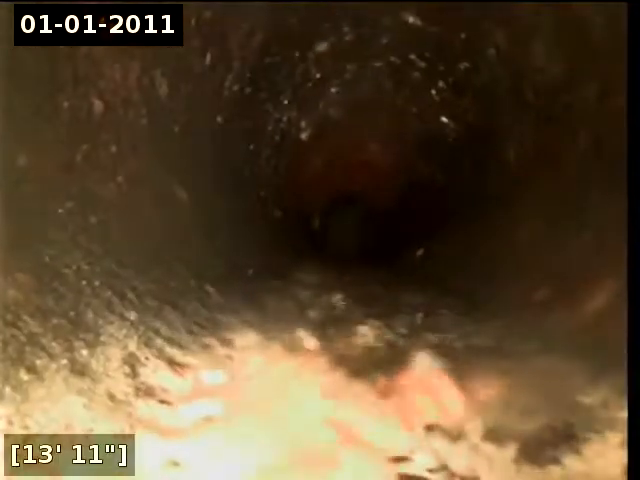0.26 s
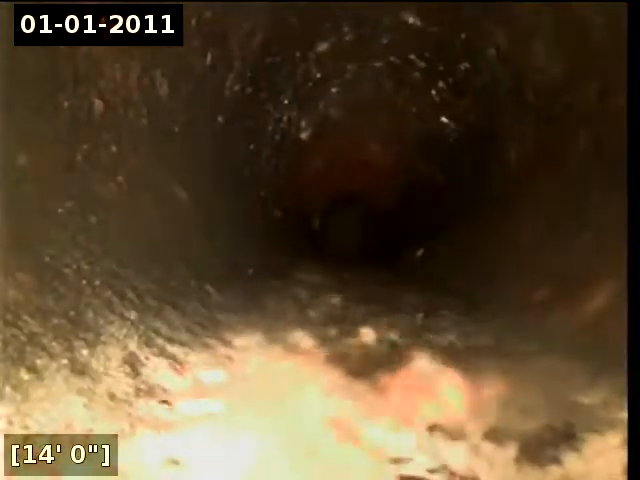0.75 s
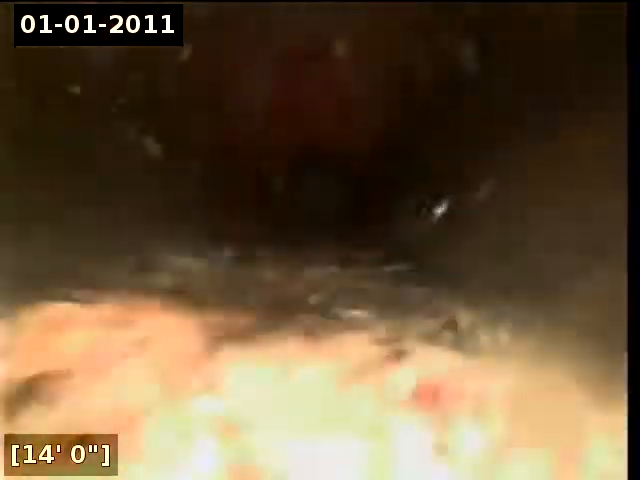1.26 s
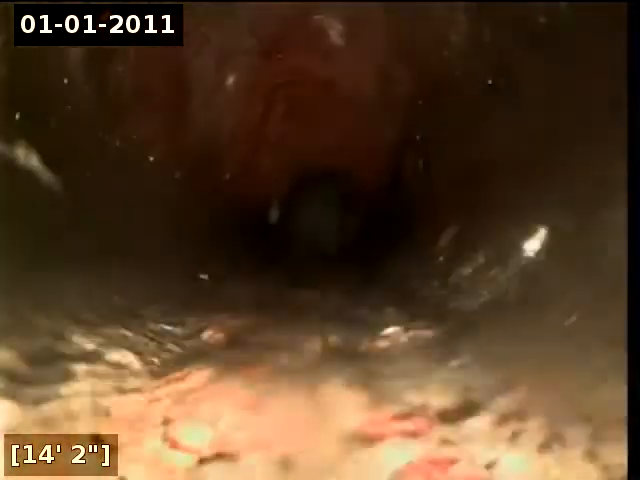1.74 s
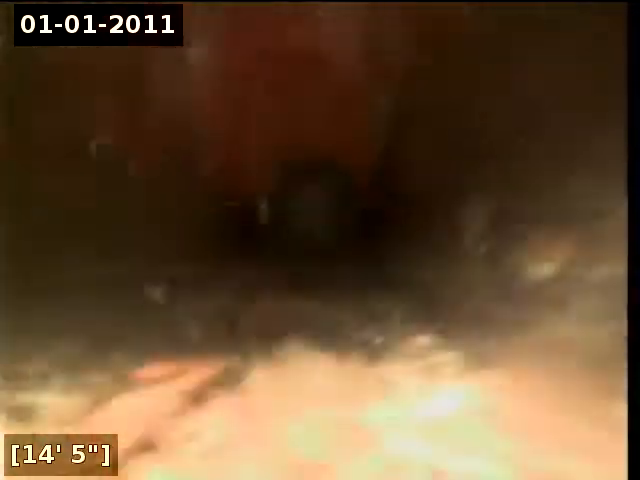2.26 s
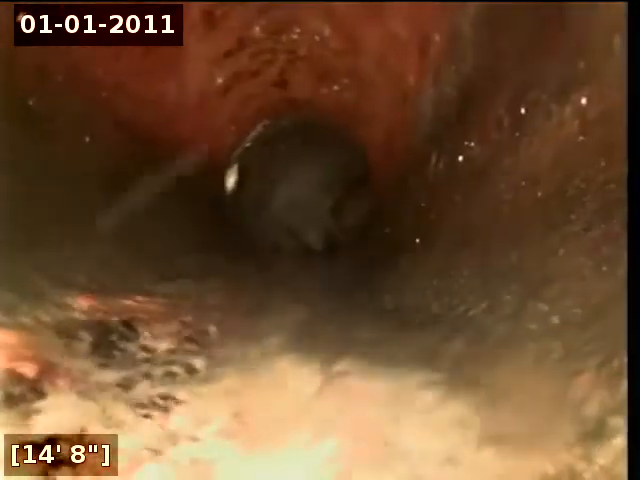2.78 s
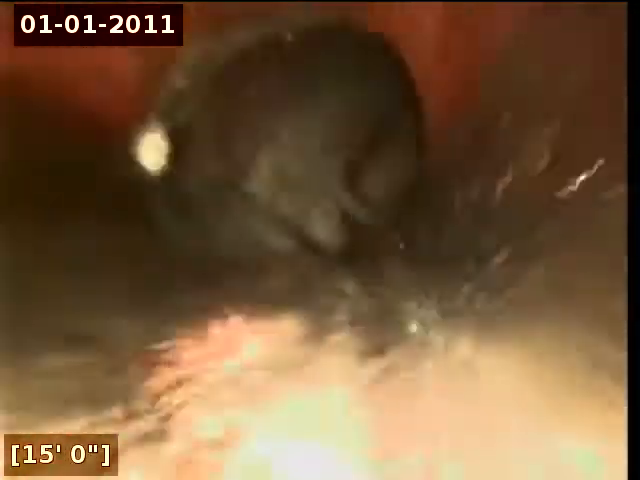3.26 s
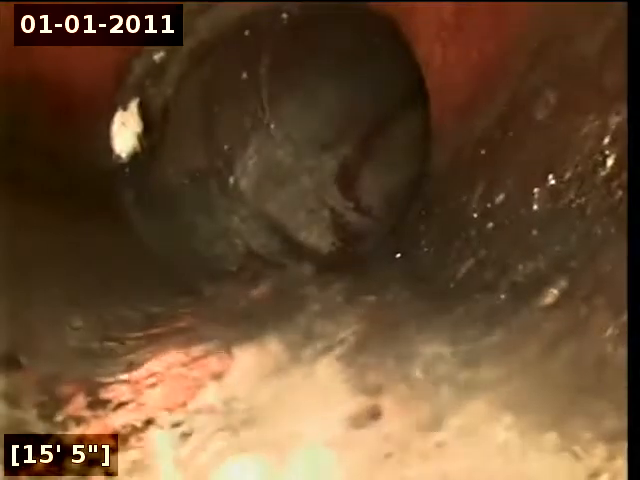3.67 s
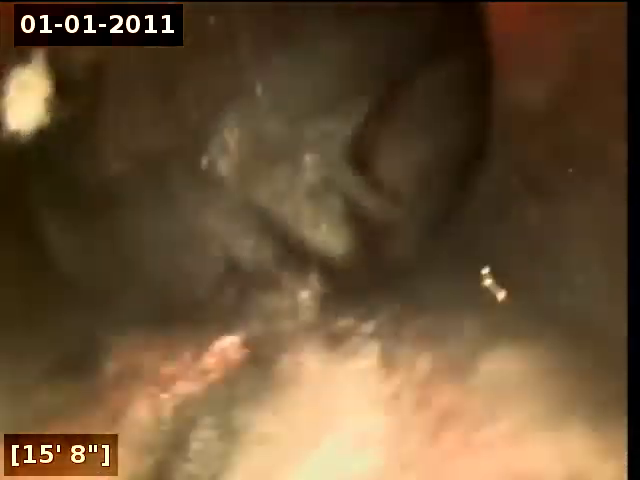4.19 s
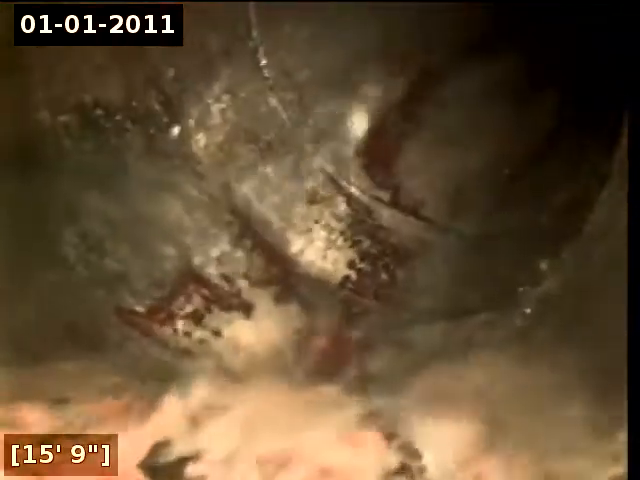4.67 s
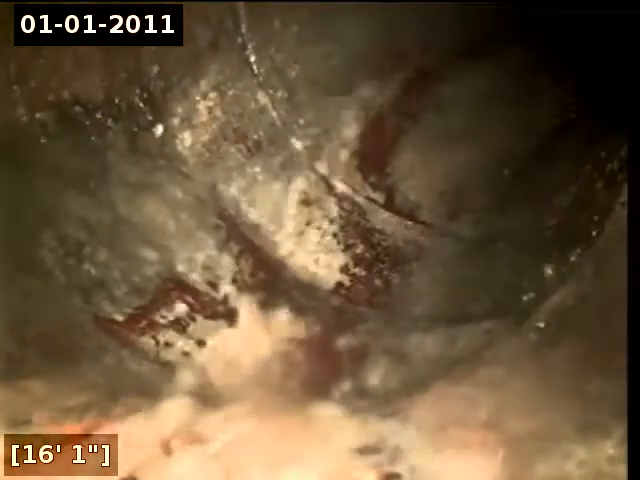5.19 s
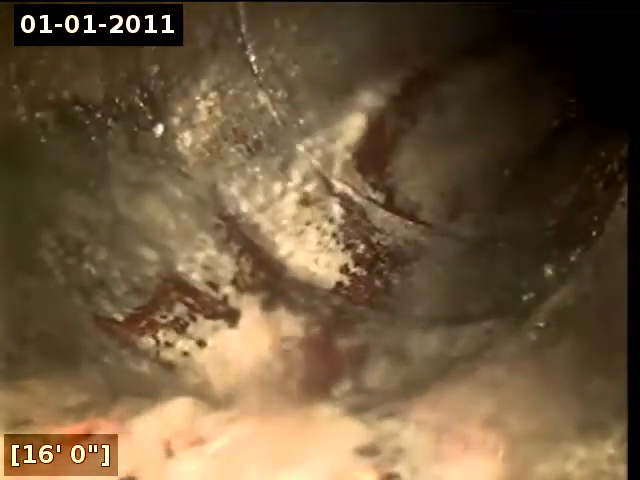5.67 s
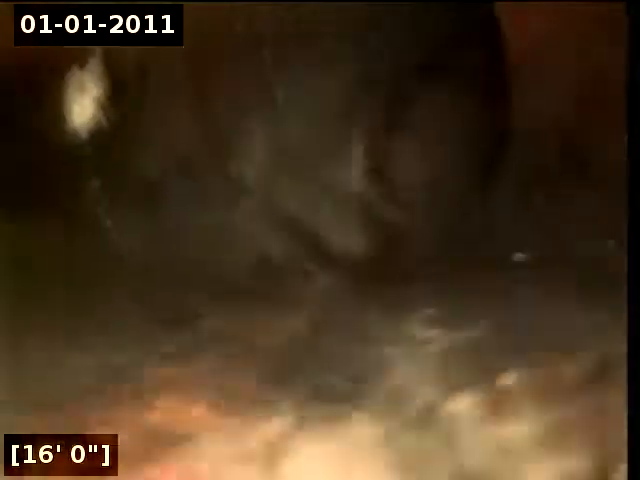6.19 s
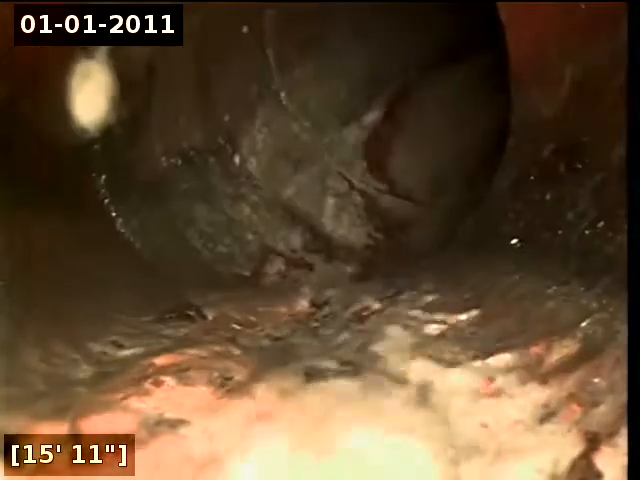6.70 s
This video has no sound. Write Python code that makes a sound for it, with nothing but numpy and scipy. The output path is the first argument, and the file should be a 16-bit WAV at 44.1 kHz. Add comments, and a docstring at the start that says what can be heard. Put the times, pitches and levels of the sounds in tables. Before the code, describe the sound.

Irregular scraping shoves of stiff cable rattle a wire reel with dull knocks and sharp clicks, dense early, sparser later, over low steady hiss.

```python
"""Hiss and a faint scrape come first; then uneven shoves of a stiff cable rasp, slap, tick and boom.
The cable is pulled off its reel by hand and pushed down a pipe: friction and contact noise ring
resonators for the hollow frame, wire cage, guide and cable skin; damped low sines are the reel rocking.
A dull room tail and coloured noise lie behind. The narrow-band recorder falls silent for a moment."""
import sys
import numpy as np
from scipy import signal
from scipy.fft import rfft, irfft
from scipy.io import wavfile
from scipy.ndimage import uniform_filter1d

SR = 44100
rng = np.random.default_rng(int(sys.argv[2]) if len(sys.argv) > 2 else 0)


def output_pcm(signal):
    """Save a mono or channel-first signal as 16-bit PCM at the path in sys.argv[1].

    Samples are clipped to [-1, 1] before scaling.
    """
    pcm = np.clip(np.atleast_2d(signal).T, -1, 1) * 32767
    wavfile.write(sys.argv[1], SR, np.round(pcm).astype(np.int16))


N = 306053
TIME = np.arange(N) / SR  # [s]

# Steady hiss spectrum: (frequency [Hz], relative density [dB])
HISS_SPECTRUM = [(12, -33.5), (25, 1.5), (70, -3), (150, -3), (300, 0.5), (550, -5), (900, -7), (1400, -6),
                 (2000, -15.5), (2700, -13.5), (3600, -27), (5800, -18), (8300, -21.5), (10000, -62.5)]
HISS_LEVEL_DB = -60

# Reel resonances, wide ones standing for many overlapping modes:
# (frequency [Hz], width [Hz], relative strength [dB])
FRAME_MODES = [(138, 510, -33), (288, 41.2, 2), (329.6, 45, 0), (425.3, 68, -3)]
CAGE_MODES = [(1040, 880, -22), (563, 130, -5.5), (835, 161, 1.5), (998, 59, 3.5), (1206, 193, -1.5),
              (1311, 50, 4), (1412, 107, 1)]
GUIDE_MODES = [(2230, 450, -14), (1733, 87, 0.5), (1925, 164, -1.5), (2228, 283, 1), (2515, 197, 0),
               (2725, 83, -2), (3030, 280, -7.5)]
SKIN_MODES = [(4800, 3300, -0.5), (5960, 2500, 3.5), (7470, 630, -4.5)]
NARROW_FRAME_MODES = FRAME_MODES[1:]

# Reel rocks on its feet: (time [s], pitch [Hz], initial envelope level [dB], t60 [s])
THUD_EVENTS = [(0.933, 152, -37, 0.13), (1.477, 168, -46, 0.12), (2.585, 75, -41.5, 0.046),
               (3.388, 69.6, -35, 0.04), (3.747, 185, -47.5, 0.19), (4.129, 94, -54.5, 0.21)]

# Cable loops bump the frame dully: (time [s], level before KNOCK_TRIM_DB [dB])
KNOCK_EVENTS = [(1.503, -32), (1.6, -29), (1.711, -42), (1.906, -41.5), (1.966, -44.5), (2.029, -49),
                (2.063, -41), (2.113, -35.5), (2.166, -30.5), (2.653, -40), (2.697, -33.5), (2.935, -42.5),
                (2.966, -38.5), (3.084, -37.5), (3.124, -29), (3.566, -50), (3.81, -49), (4.865, -32),
                (5.538, -50.5), (5.761, -47), (6.176, -45)]
KNOCK_TRIM_DB, KNOCK_CAGE_DB = -7, -13
KNOCK_T60_S, KNOCK_RING_HZ = 0.11, 338

# Cable clicks against the guide:
# (time [s], level [dB], strongest ring [Hz], skin snap re level [dB], nominal t60 [s])
CLICK_EVENTS = [(0.911, -49.5, 980, -32, .05), (0.923, -45.5, 1600, -29, 0.019),
                (0.993, -54.5, 1820, 2.5, 0.017), (1.061, -70, 1520, 11, 0.02),
                (1.282, -55, 2500, -6, .012), (1.345, -33.5, 1750, -11.5, 0.024),
                (1.84, -44.5, 1990, -2.5, 0.035), (2.07, -52, 2450, -22, 0.14),
                (3.068, -54.5, 2920, -4, 0.11), (5.228, -62, 2420, -15, 0.012),
                (5.577, -44, 1790, -24, 0.0074), (5.58, -33.5, 1730, -9.5, 0.017),
                (5.585, -36.5, 1980, -7.5, .015), (5.799, -41, 1360, -17.5, 0.029),
                (5.92, -44, 2480, -38, 0.0098), (6.061, -55, 2180, -26, 0.0092),
                (6.159, -52, 2340, -24, .01), (6.716, -58.5, 2900, -30, 0.015),
                (6.784, -55.5, 2315, -27, .018)]
CLICK_FRAME_DB = -17.5
# a click at this pitch rings cage and guide alike; higher ones spare the cage
CAGE_EVEN_HZ, CAGE_DB_PER_OCTAVE = 1370, -13

# Loops slap the cage and rattle: (time [s], level [dB], frame boom re level [dB],
# guide ring re level [dB], skin snap re level [dB], nominal rattle t60 [s], strongest ring [Hz])
SLAP_EVENTS = [(0.929, -26.5, -12.5, -6.5, -13, 0.032, 1150), (0.947, -43, -5.5, -5, -35, 0.29, 1250),
               (0.979, -37.5, -5, -14, -37, 0.081, 1050), (1.553, -31, -4.5, -10.5, -45, 0.086, 1550),
               (1.582, -36, 4, -18, -35, 0.1, 1370), (2.152, -47.5, -8, -15, -39, 0.051, 1270),
               (2.215, -47.5, -4, -7, -30, 0.056, 1190), (2.358, -34.5, -10, -13, -31, 0.048, 950),
               (2.453, -30.5, -16.5, -13.5, -23, 0.16, 1310), (2.587, -28.5, 1.5, -4, -44, 0.11, 1540),
               (2.749, -50, 3.5, -12, -29.5, 0.042, 1483), (3.018, -47, 2, -26, -34, 0.034, 600),
               (3.262, -39, 2, -19, -32, 0.048, 830), (3.285, -32.5, -1, -6.5, -40, .05, 840),
               (3.39, -25, -9.5, -2.5, -18.5, 0.14, 1300), (3.747, -43, -6, -9.5, -36, 0.16, 990),
               (4.466, -57, -5, -14, -32, 0.036, 1270), (4.692, -52.5, -2.5, -27, -33, 0.074, 1340),
               (4.844, -51.5, 11.5, -2, -32, 0.26, 1740), (4.888, -50.5, 10, -13, -48, 0.1, 600),
               (6.061, -52.5, -10, -12, -23, 0.098, 1270), (6.412, -46.5, -9.5, -4.5, -42, 0.11, 990),
               (6.546, -42, -16, -0.5, -24, 0.022, 1260)]

# Cable skin swishes through the hand: (time [s], hold [s], level [dB])
SWISH_EVENTS = [(0.03, .15, -73), (0.61, 0.41, -64.5), (1.14, 0.029, -59.5), (1.536, 0.11, -64.5),
                (1.9, 0.13, -64.5), (2.285, 0.18, -61.5), (2.704, 0.23, -68), (3.204, 0.017, -54.5),
                (3.336, .03, -62), (3.485, 0.29, -70), (4.104, 0.26, -72.5), (5.59, 0.28, -70.5),
                (6.875, .07, -66.5)]
SWISH_RISE_S, SWISH_FALL_S = 0.14, 0.16

# Cable binds in the guide and rasps: (time [s], hold [s], rise [s], fall [s], level [dB],
# guide ring re level [dB], first pitch [Hz], last pitch [Hz])
RASP_EVENTS = [(0.422, 0.028, .1, 0.19, -62.5, -1, 1453, 1493),
               (0.612, .03, 0.033, 0.056, -43.5, -9.5, 1500, 1595),
               (0.672, 0.04, 0.079, 0.12, -43, -12, 1675, 1802),
               (0.762, 0.15, 0.09, 0.13, -56, -4, 1760, 1790), (1.703, 0.091, 0.3, .2, -53, -8, 1532, 1540),
               (1.865, 0.019, 0.033, 0.093, -57, 6, 1560, 1520),
               (2.376, 0.0097, 0.13, 0.027, -36, -11.5, 1450, 1424),
               (2.463, 0.018, 0.03, 0.041, -35.5, -13, 1420, 1393),
               (3.201, .13, .18, 0.037, -52, 3.5, 1442, 1450), (5.506, .3, 0.25, .1, -60.5, 0, 1398, 1410),
               (5.848, .05, 0.063, .1, -56.5, -1, 1406, 1420), (6.83, 0.14, 0.18, .1, -58, 0.5, 1440, 1710)]

# Shoves drag the cable through the cage: (time at full speed [s], hold [s], rise [s], fall [s],
# level [dB], frame boom re level [dB], guide ring re level [dB])
SHOVE_EVENTS = [(0.183, 0.013, 0.016, 0.27, -57.5, -1, -4.5), (0.952, 0.058, 0.056, 0.1, -45.5, 0, -5),
                (1.141, 0.11, 0.19, 0.17, -42, -8, -5.5), (1.524, 0.053, 0.34, 0.23, -46.5, 2, -6.5),
                (1.96, 0.14, .1, .1, -66.5, 9, 0), (2.255, 0.24, 0.14, 0.067, -41, -1, -7),
                (3.143, .2, 0.2, 0.2, -41, 1.5, -8), (3.56, 0.22, .1, .15, -66, 9, 2),
                (4.09, 0.16, 0.2, 0.26, -47, 2, -11.5), (4.382, 0.086, .2, 0.084, -54, 6, -7),
                (4.774, 0.046, .15, 0.36, -75.5, 10, -15), (5.931, 0.013, 0.04, 0.11, -50.5, -1, -8.5),
                (6.154, 0.051, 0.17, 0.24, -55, 6, -11), (6.419, 0.0075, 0.0086, 0.19, -59, 7.5, -21)]
SWING_DB = 19  # level change of a stroke over one rise or fall time

SILENT_FROM_S, SILENT_TO_S = 2.765, 2.864
NOTCH_HZ, ROLLOFF_HZ, CUTOFF_HZ = 4010, 7500, 8900


def from_db(db):
    """Decibels to gain."""
    return 10 ** (np.asarray(db) / 20)


def rms_one(x):
    """Scale to unit power."""
    return x / np.sqrt(np.mean(x ** 2) + 1e-20)


def drift(rate_hz, step=12):
    """Slow random signal of unit power, changing about rate_hz times a second."""
    pole = np.exp(-2 * np.pi * rate_hz * step / SR)
    noise = rng.standard_normal((N + SR) // step + 2)
    # drop the filter's first second, then interpolate to the full rate
    slow = signal.lfilter([1], [1, -2 * pole, pole * pole], noise)[SR // step:]
    return np.interp(np.arange(N) / step, np.arange(len(slow)), rms_one(slow))


def wander(hz):
    """Strength [dB] over time: the contact travels, so resonances come and go."""
    return 3.7 * drift(5.3)


def resonate(force, modes, strength_db):
    """Parallel resonances weighted by place of contact, low-passed above the last mode."""
    out = 0
    for k, (hz, width_hz, db) in enumerate(modes):
        r = np.exp(-np.pi * width_hz / SR)
        poles = [1, -2 * r * np.cos(2 * np.pi * hz / SR), r * r]
        ring = signal.lfilter([1, 0, -1], poles, force + 1e-18)
        gain = (1 - r * r) / 2 * from_db(db + strength_db(hz))
        out = out + (-1) ** k * gain * ring  # alternating polarity
    lowpass_hz = min(1.35 * modes[-1][0], SR / 3)
    return signal.sosfilt(signal.butter(2, lowpass_hz, fs=SR, output="sos"), out)


def slips(per_s, spread_db, smooth):
    """Friction force: tiny catches of uneven size on top of smooth sliding."""
    size = from_db(spread_db * np.minimum(rng.exponential(1, N), 4))
    signed_size = size * rng.choice([-1, 1], N)
    catches = rms_one(signed_size * (rng.random(N) < per_s / SR))
    return rms_one(catches + smooth * rng.standard_normal(N))


def stroke(s, hold_s, rise_s, fall_s):
    """Gain of one movement: it swells up to time s, holds and fades."""
    early_s = np.maximum(s - TIME, 0)
    late_s = np.maximum(TIME - s - hold_s, 0)
    drop_db = SWING_DB * (early_s / max(rise_s, .005) + late_s / max(fall_s, .005))
    return from_db(-np.minimum(drop_db, 200))


def strike(modes, t60_s, ring_hz, chatter, uneven_db=2.5, focus_db=6):
    """Sharp contact, brief crunch and dying chatter ring one part; unit power over 10 ms."""
    age_s = TIME[:SR // 3]
    dying = from_db(-60 * age_s / np.clip(t60_s, .004, .3))
    crunch = 0.14 * np.exp(-age_s / 0.0016)
    force = rng.standard_normal(len(age_s)) * (dying + crunch)
    force *= chatter / np.linalg.norm(force)
    force[0] += 1

    def place_db(hz):
        """Resonances near the struck spot's own pitch answer most."""
        focus = np.exp(-(np.log(hz / ring_hz) / 0.24) ** 2)
        return focus_db * focus + uneven_db * rng.standard_normal()

    sound = resonate(force, modes, place_db)
    return sound / np.std(sound[:SR // 100])


def add(out, s, sound):
    """Mix a sound in at time s."""
    start = int(s * SR)
    out[start:start + len(sound)] += sound[:N - start]


def hiss():
    """Steady noise of the surroundings and the microphone, shaped in the spectrum."""
    hz, db = np.transpose(HISS_SPECTRUM)
    bin_hz = np.arange(N // 2 + 1) * SR / N
    colour = from_db(np.interp(np.log(bin_hz + 1), np.log(hz), db))
    noise = irfft(rfft(rng.standard_normal(N)) * colour, N)
    return from_db(HISS_LEVEL_DB) * rms_one(noise)


def room(x, t60_s, wall_hz):
    """Dull tail from the surrounding walls: decaying noise, delayed 8 ms and low-passed."""
    age_s = TIME[:SR // 2]
    tail = rng.standard_normal(len(age_s)) * from_db(-60 * age_s / t60_s) * (age_s > .008)
    tail /= np.linalg.norm(tail)
    reflected = signal.fftconvolve(x, tail)[:N]
    return signal.sosfilt(signal.butter(1, wall_hz, fs=SR, output="sos"), reflected)


def thuds():
    """Each rock of the reel is one heavily damped low swing."""
    out = np.zeros(N)
    age_s = TIME[:SR // 2]
    for s, hz, level_db, t60_s in THUD_EVENTS:
        swing = np.sin(2 * np.pi * hz * age_s) * from_db(level_db - 60 * age_s / t60_s)
        add(out, s, swing)
    return out


def knocks():
    """Soft bumps boom in the frame's narrow resonances and barely stir the cage."""
    out = np.zeros(N)
    for s, db in KNOCK_EVENTS:
        frame = strike(NARROW_FRAME_MODES, KNOCK_T60_S, KNOCK_RING_HZ, chatter=0.5, uneven_db=4.0, focus_db=7)
        cage = strike(CAGE_MODES, KNOCK_T60_S, KNOCK_RING_HZ, chatter=2.3)
        add(out, s, from_db(db + KNOCK_TRIM_DB) * (frame + from_db(KNOCK_CAGE_DB) * cage))
    return out


def clicks():
    """Hard, brief contacts ring the guide; low-pitched ones carry into the cage."""
    out = np.zeros(N)
    for s, db, ring_hz, snap_db, t60_s in CLICK_EVENTS:
        cage_db = CAGE_DB_PER_OCTAVE * np.log2(ring_hz / CAGE_EVEN_HZ)
        hit = strike(GUIDE_MODES, t60_s, ring_hz, chatter=0.75, uneven_db=7.0)
        hit += from_db(cage_db) * strike(CAGE_MODES, t60_s, ring_hz, chatter=5.2)
        hit += from_db(CLICK_FRAME_DB) * strike(FRAME_MODES, t60_s, ring_hz, chatter=0.99)
        hit += from_db(snap_db) * strike(SKIN_MODES, t60_s * .5, ring_hz, chatter=0.71)
        add(out, s, from_db(db) * hit)
    return out


def slaps():
    """Loops of cable slap the whole reel; the chatter driving the bright skin dies fastest."""
    out = np.zeros(N)
    for s, db, boom_db, guide_db, snap_db, t60_s, ring_hz in SLAP_EVENTS:
        hit = strike(CAGE_MODES, t60_s * 1.01, ring_hz, chatter=1.5)
        hit += from_db(boom_db) * strike(NARROW_FRAME_MODES, t60_s, ring_hz, chatter=0.96)
        hit += from_db(guide_db) * strike(GUIDE_MODES, t60_s, ring_hz, chatter=1.3)
        hit += from_db(snap_db) * strike(SKIN_MODES, t60_s * .5, ring_hz, chatter=4.5)
        add(out, s, from_db(db) * hit)
    return out


def swishing():
    """Fine, bright friction of the cable's skin: dense slips through wide resonances."""
    strokes = [from_db(db) * stroke(s, hold_s, SWISH_RISE_S, SWISH_FALL_S)
               for s, hold_s, db in SWISH_EVENTS]
    force = slips(per_s=4000, spread_db=3.0, smooth=2.0)
    skin = resonate(force, SKIN_MODES, lambda hz: 1.2 * drift(9))
    return np.max(strokes, axis=0) * rms_one(skin)


def rasp(drift_hz, band_db):
    """Stick-slip too irregular for a clean squeak: a rough gliding band that rings the guide."""
    band = (drift(drift_hz) + 1j * drift(drift_hz)) * from_db(2.0 * drift(120))
    band /= np.std(band.real)
    force = slips(per_s=780, spread_db=-0.5, smooth=0.7)
    guide = rms_one(resonate(force, GUIDE_MODES, wander))
    out = 0
    for s, hold_s, rise_s, fall_s, db, guide_db, first_hz, last_hz in RASP_EVENTS:
        pitch_hz = np.interp(TIME, [s, s + hold_s], [first_hz, last_hz])
        phase = 2 * np.pi * np.cumsum(pitch_hz) / SR
        rough_tone = from_db(band_db) * np.real(band * np.exp(1j * phase))
        gain = from_db(db) * stroke(s, hold_s, rise_s, fall_s)
        out = out + gain * (rough_tone + from_db(guide_db) * guide)
    return out


def rubbing():
    """With each shove the cable judders through cage and guide; its loops jostle the frame."""
    cage_gain, frame_gain, guide_gain = 0, 0, 0
    for s, hold_s, rise_s, fall_s, db, boom_db, guide_db in SHOVE_EVENTS:
        gain = from_db(db) * stroke(s, hold_s, rise_s, fall_s)
        cage_gain = np.maximum(cage_gain, gain)
        frame_gain = np.maximum(frame_gain, gain * from_db(boom_db))
        guide_gain = np.maximum(guide_gain, gain * from_db(guide_db))
    judder = from_db(1.5 * drift(50))
    force = slips(per_s=450, spread_db=2.3, smooth=0.45) * judder
    jostle = slips(per_s=130, spread_db=3.0, smooth=0.41)
    frame = rms_one(resonate(force + 0.69 * jostle, FRAME_MODES, lambda hz: 1.6 * drift(12)))
    cage = rms_one(resonate(force, CAGE_MODES, wander))
    guide = rms_one(resonate(force, GUIDE_MODES, wander))
    return frame_gain * frame + cage_gain * cage + guide_gain * guide


def scene():
    """The reel close by, a little room and the steady hiss."""
    reel = thuds() + knocks() + clicks() + slaps() + swishing()
    reel += rasp(drift_hz=250, band_db=-3.0) + rubbing()
    walls = from_db(-17.5) * room(reel, t60_s=0.3, wall_hz=2000)
    return (reel + walls + hiss())[None]


def record(dry):
    """The recorder notches out one band, rounds off the top and mutes briefly."""
    # wide dip with a narrow deep centre
    x = signal.lfilter(*signal.iirnotch(NOTCH_HZ, 4, fs=SR), dry)
    notch_edges_hz = [NOTCH_HZ - 110, NOTCH_HZ + 110]
    x = signal.sosfilt(signal.butter(2, notch_edges_hz, "stop", fs=SR, output="sos"), x)
    x = signal.sosfilt(signal.butter(8, ROLLOFF_HZ, fs=SR, output="sos"), x)
    audible = 1.0 * ((TIME < SILENT_FROM_S) | (TIME > SILENT_TO_S))
    x = x * uniform_filter1d(audible, size=60)  # edges ramp over 60 samples
    return signal.sosfilt(signal.ellip(10, .2, 80, CUTOFF_HZ, fs=SR, output="sos"), x)


dry = scene()
out = record(dry)
output_pcm(out)
```